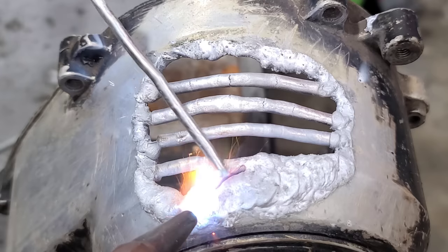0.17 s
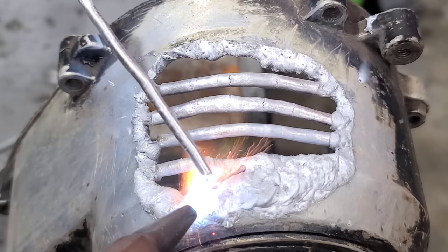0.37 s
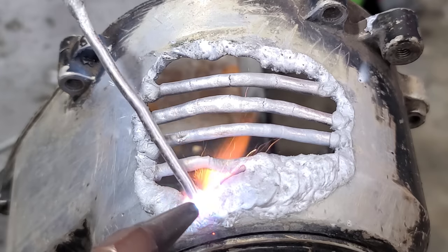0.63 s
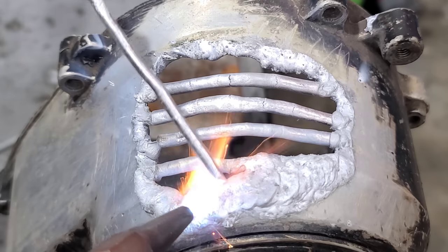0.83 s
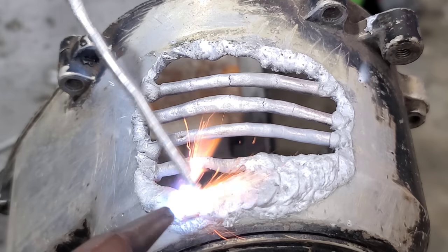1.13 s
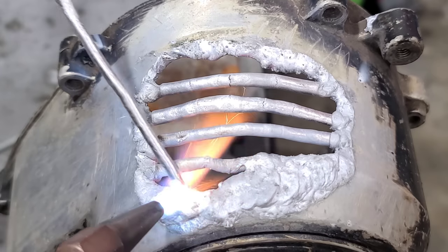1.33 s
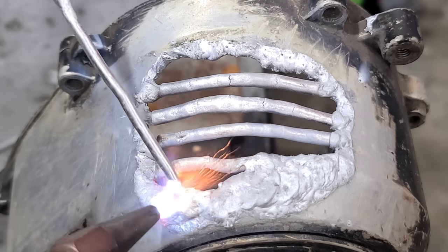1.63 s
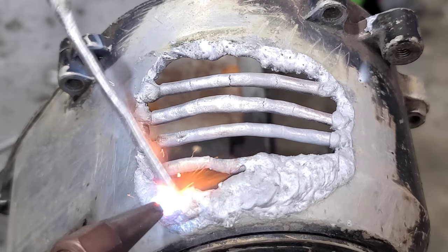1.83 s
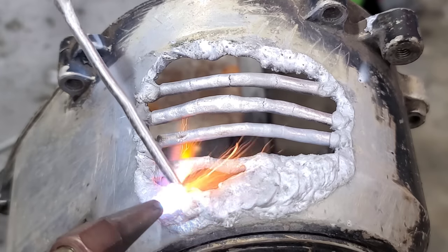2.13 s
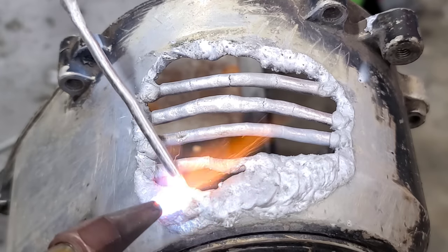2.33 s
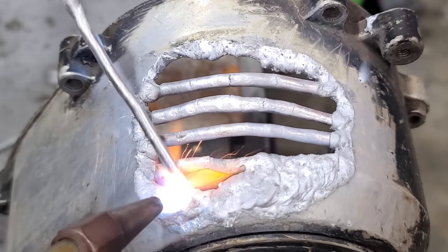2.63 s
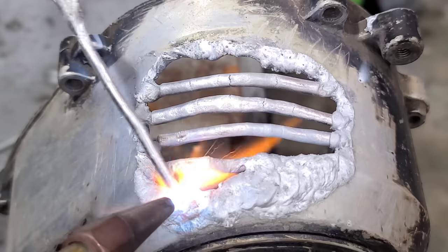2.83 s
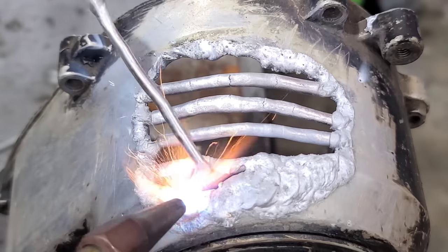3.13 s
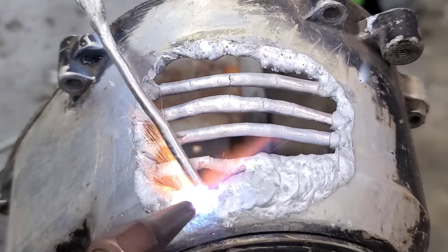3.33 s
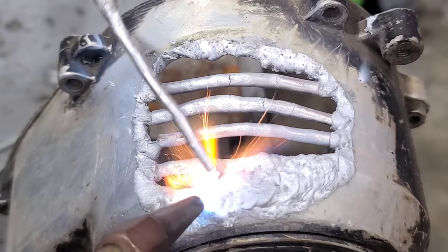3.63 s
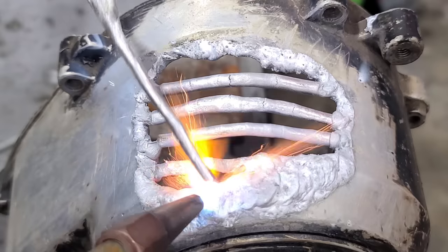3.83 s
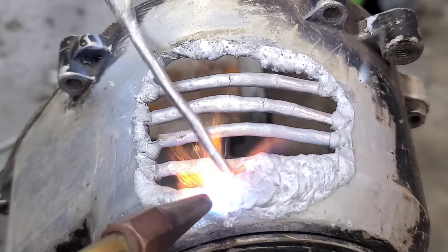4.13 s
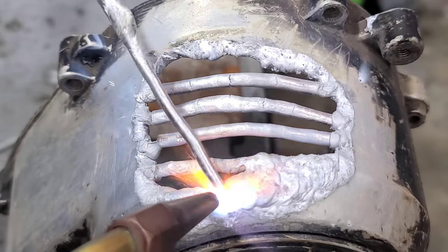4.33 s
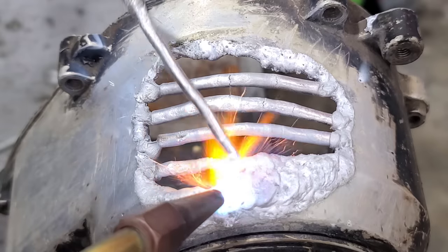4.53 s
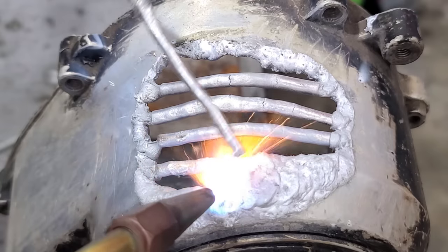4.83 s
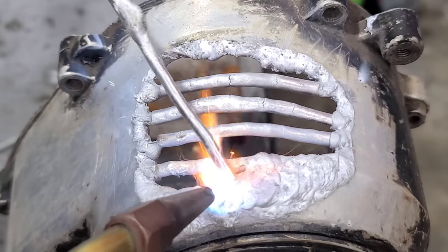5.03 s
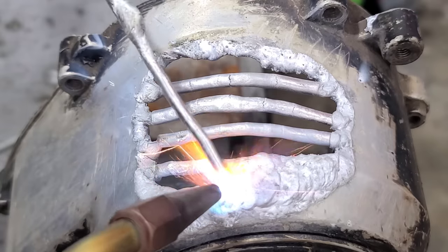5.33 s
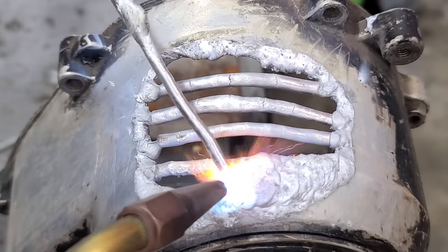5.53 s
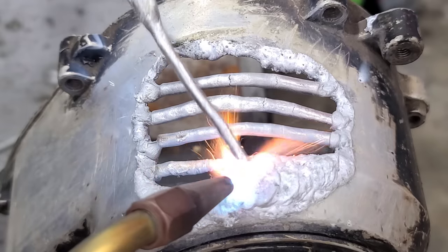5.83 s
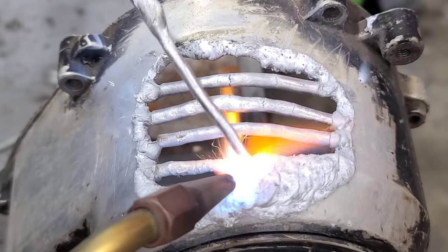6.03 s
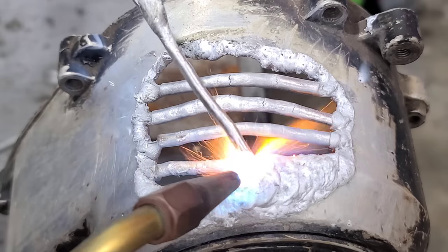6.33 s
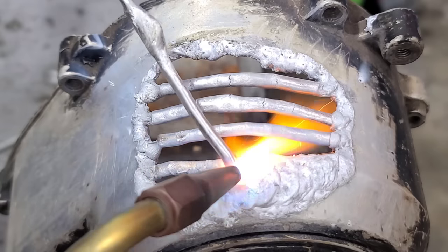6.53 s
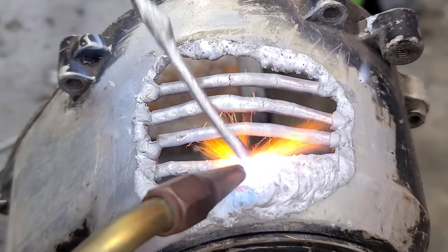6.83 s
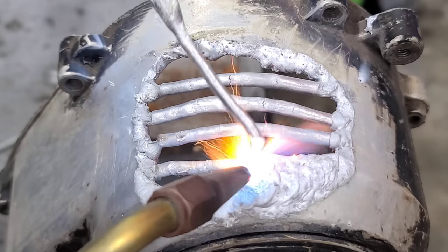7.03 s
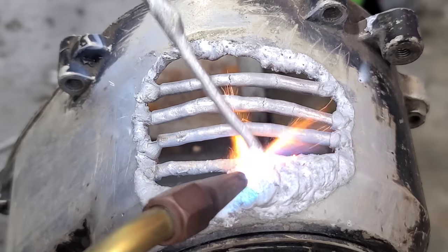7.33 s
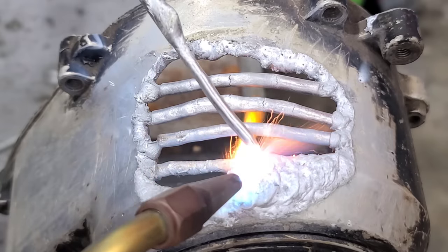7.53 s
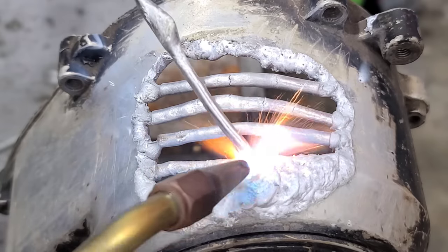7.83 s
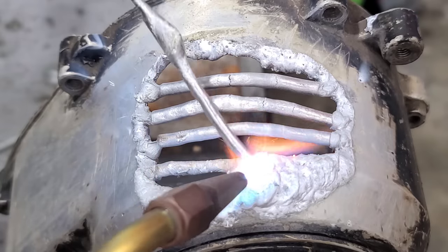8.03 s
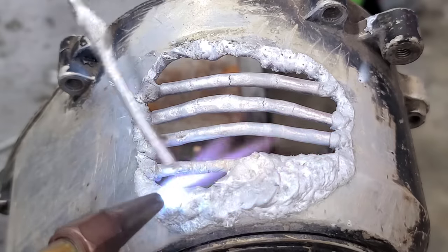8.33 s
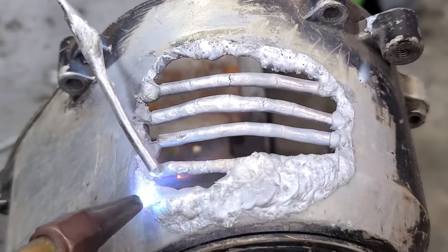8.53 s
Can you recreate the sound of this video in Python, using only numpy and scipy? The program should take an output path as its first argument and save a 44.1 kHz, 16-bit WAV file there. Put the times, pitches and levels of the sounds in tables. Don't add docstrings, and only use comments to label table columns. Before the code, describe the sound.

Close stereo sound of torch work on a hollow metal part in a workshop: a constant, dense high hiss from the nozzle, a rough flickering flame that flares and stutters, brief spitting bursts of melt, and dull low pops and short hums from the cavity. The loudest spits cluster midway, with more later; the hiss continues to the end over faint rumble.

```python
import sys
import numpy as np
from scipy import signal
from scipy.fft import rfft, irfft, next_fast_len
from scipy.io import wavfile
from scipy.ndimage import uniform_filter1d, minimum_filter1d, map_coordinates

SR = 44100
rng = np.random.default_rng(int(sys.argv[2]) if len(sys.argv) > 2 else 0)


def to_wav(s):
    ch = np.atleast_2d(s).T
    pcm = np.round(np.clip(ch, -1, 1) * 32767)
    wavfile.write(sys.argv[1], SR, pcm.astype(np.int16))


def convert_level_to_amplitude(level_db):
    exponent = np.asarray(level_db, float) / 20
    return 10 ** exponent


N = 382788


def unit(x):
    return x / np.sqrt(np.mean(x ** 2) + 1e-20)


def along(points, hz):
    f, value = np.transpose(points)
    return np.interp(np.log(hz + 1), np.log(f + 1), value)


def curves(rows, t=None):
    s, *columns = np.transpose(rows)
    if t is None:
        t = np.arange(N) / SR
    return [np.interp(t, s, column) for column in columns]


def wobble(rate):
    coarse = np.arange(0, N + 32, 32)
    knots = rng.standard_normal(int(N * 300 / SR))
    return np.interp(np.arange(N), coarse, map_coordinates(knots, [coarse * rate / SR]))


def filtered(x, response):
    m = next_fast_len(N + 8192)
    return irfft(rfft(x, m) * response(np.fft.rfftfreq(m, 1 / SR)), m)[..., :N]


def bump(s, rise, fall):
    start = max(round(s * SR) - 4000, 0)
    t = np.arange(start, min(start + 8000, N)) / SR - s
    width = np.where(t < 0, rise, fall)
    return slice(start, start + len(t)), t, np.exp(-.5 * (t / width) ** 2)


# (frequency [Hz], width [Hz], level over the smooth jet [dB], extra left-right level [dB])
TUBE_MODES = [(390, 78, 7, 4), (1077, 187, 8, 2), (2000, 220, 9, 1.5), (2520, 110, -0.5, -9),
              (2962, 124, 9.5, 5.5), (3500, 190, -3.5, -11), (3886, 260, 3.5, 4), (4470, 200, -1.5, 0.5),
              (5230, 180, 7.5, 5), (5950, 220, 7.5, -4), (6100, 140, 8.5, 3), (6825, 190, 9, 8.5),
              (6370, 280, 0.5, 2), (6970, 250, -2, 3), (8930, 270, -2.5, -6.5), (9730, 260, -2, -7),
              (10260, 230, -1.5, 0), (7687, 285, 10, -2), (8470, 310, 7, -7), (9160, 270, 9.5, 4),
              (9980, 460, 5, 1.5), (10850, 310, 5, 3), (11860, 620, 4.5, 1), (12340, 330, -7, -0.5),
              (13000, 340, 10.5, 7), (12910, 320, -14.5, -9), (13550, 250, 4.5, -4), (14500, 330, -0.5, -6),
              (14500, 280, 1.5, -1)]


def tube(hz, depth, column=2):
    grid = np.arange(0, SR / 2, 20)
    total_db = 0
    for mode in TUBE_MODES:
        total_db = total_db + mode[column] / (1 + (2 * (grid - mode[0]) / mode[1]) ** 2)
    return np.interp(hz, grid, depth * total_db)


def noise(spectrum, depth=0., patchy_db=0., grain_db=0.):
    grain = np.tanh(unit(uniform_filter1d(rng.standard_normal(N), size=14)) / 2) * 2
    pair = rng.standard_normal((2, N)) * convert_level_to_amplitude(grain_db * grain)
    if patchy_db:
        z = signal.stft(pair.astype(np.float32), nperseg=512)[2]
        field = uniform_filter1d(rng.standard_normal(z.shape[1:]), size=14, axis=0)
        field = uniform_filter1d(field, size=6, axis=1)
        patches = convert_level_to_amplitude(patchy_db * unit(field)).astype(np.float32)
        pair = signal.istft(z * patches, nperseg=512)[1][:, :N]
    return unit(filtered(pair, lambda hz: convert_level_to_amplitude(along(spectrum, hz) + tube(hz, depth))))


# (frequency [Hz], level per Hz [dB])
JET_SPECTRUM = [(200, -16), (400, -13), (1000, -11), (2000, -8.5), (3000, -2.5), (3400, -4.5), (4500, 3.5),
                (5500, -3), (7000, 1), (12000, 2.5), (16000, -5)]
JET_DB = -50


def jet():
    level_db = JET_DB + gain_db() + 14.5 + 0.57 * wobble(20)
    return convert_level_to_amplitude(level_db) * noise(JET_SPECTRUM, depth=0.87)


# (frequency [Hz], level per Hz [dB])
CORE_SPECTRUM = [(2000, -35.5), (4500, -23), (6000, -22.5), (8000, -11.5), (10000, -2.5), (12000, 0.5),
                 (13500, -5), (16000, -19.5)]
EDGE_SPECTRUM = [(10000, -36), (13000, 1.5), (14000, -9.5), (16000, -2.5)]
SKIRT_SPECTRUM = [(2500, -25), (4300, -18), (5400, -6), (6600, -3), (8000, -7), (10000, -7.5)]
# (time [s], splash level [dB], edge brightness [dB])
FLAME = [(0.0, -31.5, -3), (0.3, -34.5, -5.5), (1.1, -31, -10.5), (1.5, -31, -7.5), (2.2, -26, -11),
         (2.9, -29, -8.5), (3.6, -27.5, -7.5), (4.3, -25, -15), (4.66, -31.5, -6), (5.22, -35, -14),
         (5.33, -29.5, -6), (5.9, -33, -10.5), (6.45, -27, -7.5), (6.65, -32, -6), (7.2, -27.5, -7),
         (8.1, -27, -7.5), (8.3, -31, -6), (8.68, -31, -2.1)]


def splash():
    slow_db, bright_db = curves(FLAME)
    quick_db, extra_db = flares_and_chokes()
    flicker = convert_level_to_amplitude(0.36 * wobble(16) + 0.9 * wobble(45) + 0.41 * wobble(150))

    core_db = slow_db + quick_db
    edge_db = core_db + bright_db + 1.85 * extra_db
    skirt_db = -42 + gain_db() + 0.95 * (slow_db - slow_db.mean()) + 0.1 * quick_db

    core = convert_level_to_amplitude(core_db + 1.5) * noise(CORE_SPECTRUM, depth=.8, patchy_db=1.5, grain_db=3)
    edge_level = convert_level_to_amplitude(edge_db + 9.5 + 0.52 * wobble(25))
    edge = edge_level * noise(EDGE_SPECTRUM, depth=.8, patchy_db=1.1, grain_db=2.3)
    skirt_level = convert_level_to_amplitude(skirt_db - 1.0 + 1.5 * wobble(25))
    skirt = skirt_level * noise(SKIRT_SPECTRUM, depth=0.58, patchy_db=2.0, grain_db=3)
    return flicker * (core + edge + skirt)


# (time [s], level change [dB], half length [ms], extra edge level [dB])
FLARES = [(0.22, 0.5, 24, 5), (0.549, 4.5, 28, 2.5), (0.678, 6.5, 21, 2.5), (0.848, 0, 17, 3),
          (1.746, -5.5, 26, 5.3), (1.83, 0.5, 25, 1.5), (2.09, -2, 22, 1), (2.604, -1, 8.5, 4),
          (3.53, 2.1, 23, 1), (4.045, 1.5, 14, -2), (4.25, 1, 14, 4), (4.58, 0.5, 20, 2),
          (5.068, 1.5, 19, -1), (5.208, 2, 18, 3), (5.39, 1.5, 14, 2.5), (5.567, 3, 23, 2.5),
          (5.697, 4.5, 15, 2.1), (6.016, 4, 40, 2.1), (6.176, 3.3, 14, 1), (6.266, 4, 32, 0.5),
          (7.49, 0, 20, 1), (7.96, 1.5, 25, 1), (8.07, 2.5, 25, 0), (8.232, 2.1, 12, 0.5),
          (8.36, 1, 13, 0.5), (8.6, 0, 15, 0)]
# (time [s], level change [dB], half length [ms], extra edge level [dB])
CHOKES = [(1.337, -9, 18, 0), (1.487, -8, 12, 2.5), (1.556, -10, 9.2, -4), (1.686, -5, 20, -2.5),
          (1.906, -7, 28, 1), (2.175, -9.5, 30, 1), (2.415, -5, 36, 2), (2.544, -7.5, 39, 3),
          (2.734, -2.1, 17, -5), (3.452, -3.5, 20, 0), (3.622, -2, 61, -5), (3.791, -5, 5.7, 0),
          (3.885, -5.5, 29, 2), (4.081, -6.5, 22, -2), (4.2, -6, 13, 2), (4.29, -5.5, 15, -9),
          (4.47, -4, 50, 2), (4.54, -4, 14, .7), (4.689, -7.5, 41, 3), (4.869, -2.5, 28, -3),
          (6.216, -5.5, 12, -1), (6.583, -16, 23, 0), (6.805, -3, 28, 1.5), (7.174, -8, 16, 4.5),
          (7.313, -3.5, 12, -3), (7.423, -2, 20, -2), (7.673, -4.5, 55, 0.5), (7.852, -2.5, 17, 0),
          (8.181, -6, 18, 0), (8.535, -6.5, 30, -1)]


def flares_and_chokes():
    change = np.zeros((2, N))
    for s, db, half, edge_db in [*FLARES, *CHOKES]:
        span, _, swell = bump(s, half / 1000, half / 1000)
        change[:, span] += np.outer([db, edge_db], swell)
    return change


# (frequency [Hz], level per Hz [dB])
SPRAY_SPECTRUM = [(2000, -42), (4500, -14.5), (8000, -8), (12000, 1.5), (16000, -5.5)]
REACH_SPECTRUM = [(600, -23), (1400, -12.5), (3000, -2), (4500, 5.5), (7000, 0), (10000, -32)]
# (time of the top [s], level [dB], rise [ms], fall [ms], relative low reach level [dB])
SPITS = [(0.189, -21.5, 6.6, 3.3, -14), (.235, -38, 8, 6.7, -21), (1.422, -25, 12, 9, -29),
         (2.761, -21, 7, 5.5, -29), (2.789, -18.5, 7.9, 4.6, -38), (3.022, -16.5, 10.5, 8.5, -18),
         (3.206, -25, 5.5, 5, -29), (3.718, -12, 3.3, 3.8, -22), (4.384, -12, 7.1, 9.5, -28),
         (4.396, -22.5, 9.2, 13, -10), (4.505, -6, 6.1, 6.9, -23.5), (4.622, -14.5, 1.8, 2.5, -28),
         (4.633, -17, .6, 1.2, -19), (4.649, -15, 10.7, 6.6, -19), (4.809, -30, 4.1, 5, -34),
         (5.69, -30.5, 7.4, 9.8, -15), (5.995, -34, 7, 7, -30), (6.153, -20.5, 11, 5, -23),
         (6.559, -12.5, 8.5, 6, -30), (6.596, -16, 0.41, 0.72, -19), (6.603, -18.5, 1.1, 4.2, -9),
         (6.903, -21.5, 3.8, 10, -29), (7.147, -19, 2, 1.5, -27), (7.153, -16.5, 2.2, 1.4, -20)]


def spits():
    high, low = np.zeros(N), np.zeros(N)
    for s, db, rise, fall, reach_db in SPITS:
        span, _, swell = bump(s, rise / 1000, fall / 1000)
        high[span] += convert_level_to_amplitude(db) * swell
        low[span] += convert_level_to_amplitude(db + reach_db + 5.0) * swell
    spray = high * noise(SPRAY_SPECTRUM, depth=0.2, grain_db=2)
    reach = low * noise(REACH_SPECTRUM, grain_db=3)
    return (spray + reach) * [[1], [.45]]


# (time [s], peak level [dB], frequency [Hz])
POPS = [(1.337, -43, 124), (1.499, -51, 99.6), (2.31, -39, 109), (2.512, -42, 113), (2.779, -38, 115),
        (2.988, -33, 99), (3.262, -46, 72.7), (4.128, -40, 94.2), (4.273, -38, 137), (5.399, -46, 113),
        (6.075, -43, 99.6), (6.587, -35, 101), (7.145, -35.5, 99.6), (7.811, -60, 118)]
# (time of the middle [s], level [dB], half length [ms], frequency [Hz], glide [Hz/s])
HUMS = [(1.37, -54, 40, 130, 0), (1.7, -59, 63, 274, 0), (1.76, -52, 22, 400, 0), (1.82, -48.5, 13, 400, 0),
        (2.54, -70, 20, 348, 14000), (2.765, -57, 15, 220, 7996), (3.08, -57, 55, 121, -2),
        (3.14, -56, 30, 527, 0), (3.2, -51, 46, 414, 300), (3.32, -53, 23, 542, -300),
        (3.41, -57.5, 22, 455, -300), (4.32, -59, 53, 128, -100), (7.82, -55, 30, 125, -2),
        (7.87, -55, 25, 444, 0)]


def cavity():
    out = np.zeros(N)
    for s, db, hz in POPS:
        span, t, swell = bump(s + 0.0075, 0.0018, 0.01)
        out[span] += convert_level_to_amplitude(db - 10.5) * swell * np.sin(2 * np.pi * hz * t)
    for s, db, half, hz, glide in HUMS:
        span, t, swell = bump(s, half / 1400, half / 1400)
        cycles = hz * t + glide * t * t / 2
        out[span] += convert_level_to_amplitude(db + 1) * swell * np.sin(2 * np.pi * cycles)
    return out


def blend(pair, alike, hz):
    turn = np.arccos(np.clip(along(alike, hz), -1, 1)) / 2
    side = np.array([1, -1])[:, None, None]
    return pair[0] * np.cos(turn) + side * pair[1] * np.sin(turn)


# (time [s], lead of the left port [samples], left-right level [dB])
AIM = [(0, 4.7, 5.5), (.13, 5.1, -0.5), (.25, 4.77, 3.5), (.95, 4.6, 1), (1.2, 5.05, 5.5),
       (1.45, 5.54, 4.5), (2.65, 5.33, 5), (2.87, 5.27, 4), (3.3, 4.82, 4.5), (4.3, 4.1, 3), (5.4, 4.2, 3),
       (5.8, 3.7, 9.5), (6.0, 4, 2.5), (6.45, 3.9, 0), (7.25, 3.63, 0.5), (8.22, 3.84, 1), (8.36, 5.4, 5.5),
       (8.68, 6.2, 2)]
# (frequency [Hz], coherence [0-1])
ALIKE = [(400, .92), (800, .6), (1050, .85), (1400, .5), (2000, .85), (2350, .3), (2900, .85), (3250, .5),
         (3480, .9), (4800, .84), (5800, .68), (9000, .85), (13000, .83), (16000, .72)]
# (frequency [Hz], extra left-right level [dB])
SHADE = [(700, 0.5), (2000, 0), (3000, 6.5), (4500, -1.5), (8000, 1.5), (11000, -2.5), (13000, 3.5),
         (16000, 4)]
# (frequency [Hz], extra phase [rad])
BEND = [(1500, 0.023), (2100, -0.42), (2580, 1.1), (3100, -0.3), (3550, 0.4), (4150, -0.55), (4700, -0.05),
        (5500, -0.3), (6800, 0.75), (7600, 2.0), (8300, 0.94), (9500, 0.22), (16000, -0.43)]


def ports(pair):
    hz, t, z = signal.stft(pair, SR, nperseg=512)
    hz = hz[:, None]
    lead, aim_db = curves(AIM, t)
    phase = 2 * np.pi * hz * lead / SR + along(BEND, hz)
    level_db = aim_db * np.clip(hz / 11000, .3, 1.5) + along(SHADE, hz) + tube(hz, depth=0.9, column=3)
    side = np.array([.5, -.5])[:, None, None]
    z = blend(z, ALIKE, hz) * convert_level_to_amplitude(side * level_db) * np.exp(1j * side * phase)
    return signal.istft(z, SR, nperseg=512)[1][:, :N]


# (time [s], depth [dB])
DUCKS = [
    (4.4, -0.7),
    (4.52, -1.5),
    (4.66, -2.5),
    (6.57, -1.5),
    (6.62, -1.8),
]
DUCK_S, RECOVER_S = 0.018, 1.62


def gain_db():
    t = np.arange(0, N / SR + .01, .005)
    pull = np.zeros(len(t))
    for s, db in DUCKS:
        after = np.maximum(t - s, 0)
        pull += db * (1 - np.exp(-after / DUCK_S)) * np.exp(-after / RECOVER_S)
    return np.interp(np.arange(N) / SR, t, pull)


# (frequency [Hz], level per Hz [dB])
SHOP_SPECTRUM = [(20, -27), (40, -4), (125, -4), (170, -9), (400, -5.5), (1000, -11.5), (3000, -18),
                 (9000, -22.5)]
# (frequency [Hz], coherence [0-1])
SHOP_ALIKE = [(60, 0.94), (300, 0.89), (700, 0.51), (1500, 0.094)]


def shop():
    pair = noise(SHOP_SPECTRUM, depth=.4, patchy_db=1.5)
    hz, _, z = signal.stft(pair, SR, nperseg=1024)
    air = signal.istft(blend(z, SHOP_ALIKE, hz[:, None]), SR, nperseg=1024)[1][:, :N]
    return convert_level_to_amplitude(JET_DB + gain_db() - 4.0 + 0.25 * wobble(6.5)) * air


def scene():
    torch = ports(jet() + splash() + spits())
    return torch + cavity() * convert_level_to_amplitude([[.5], [-.5]]) * 1 + shop()


def low_pass(x):
    return signal.sosfilt(signal.butter(12, 17070, fs=SR, output="sos"), x)


def record(dry):
    ripple = convert_level_to_amplitude(1.15 * np.cos(2 * np.pi * (np.arange(N) - 124) / 1024))
    envelope = -minimum_filter1d(-np.abs(dry).max(0), size=200)
    hold = uniform_filter1d(np.minimum(1, .85 / envelope), size=150)
    mix = filtered(dry * ripple * hold, lambda hz: hz < 15790)
    return low_pass(mix)


dry = scene()
out = record(dry)
to_wav(out)
```